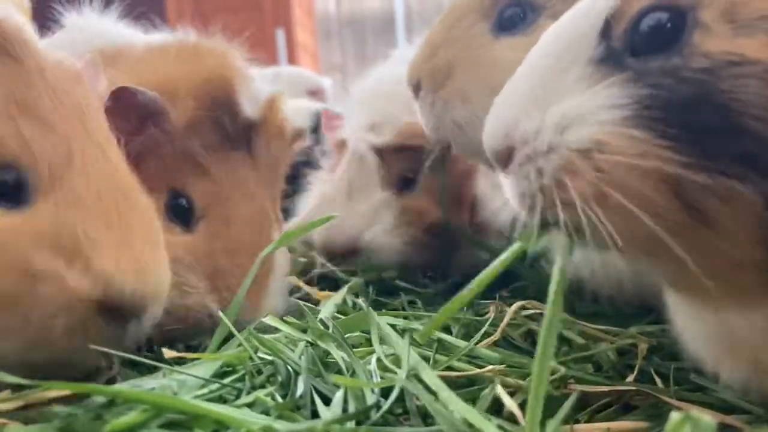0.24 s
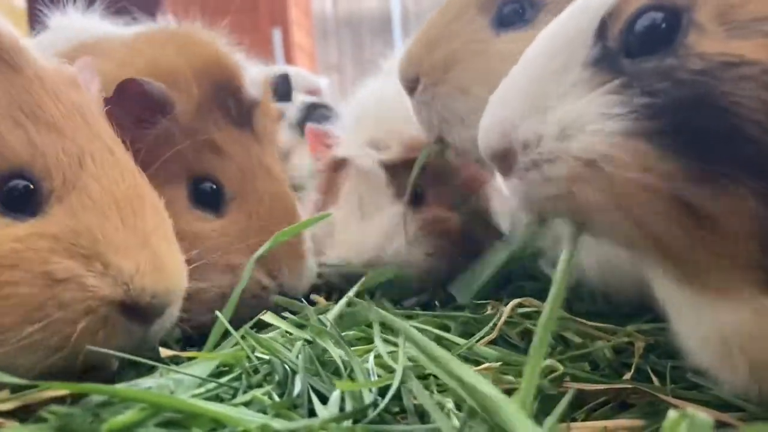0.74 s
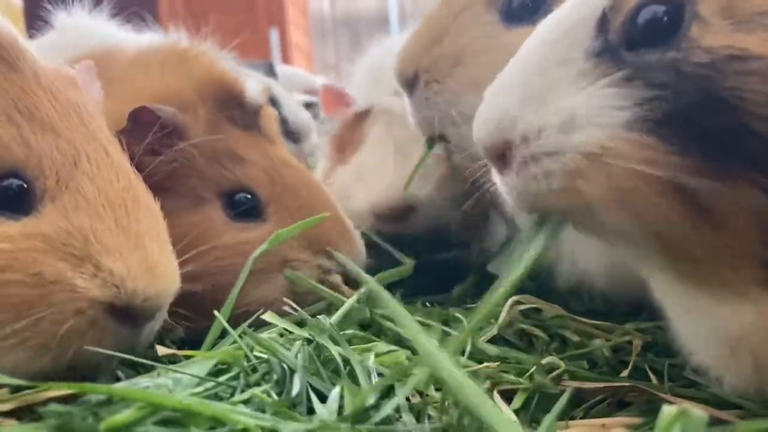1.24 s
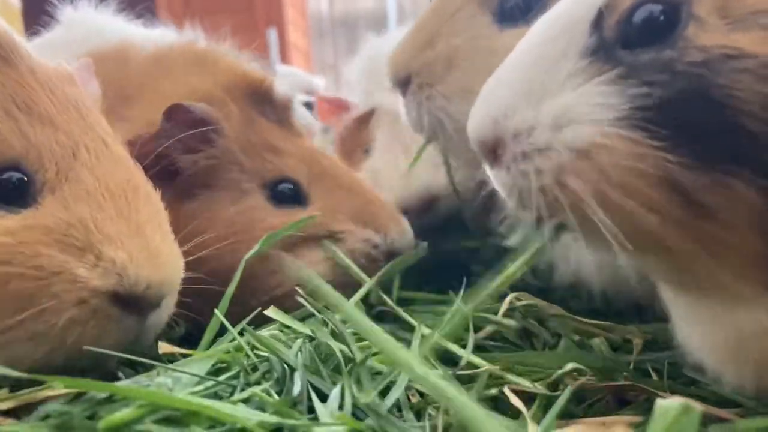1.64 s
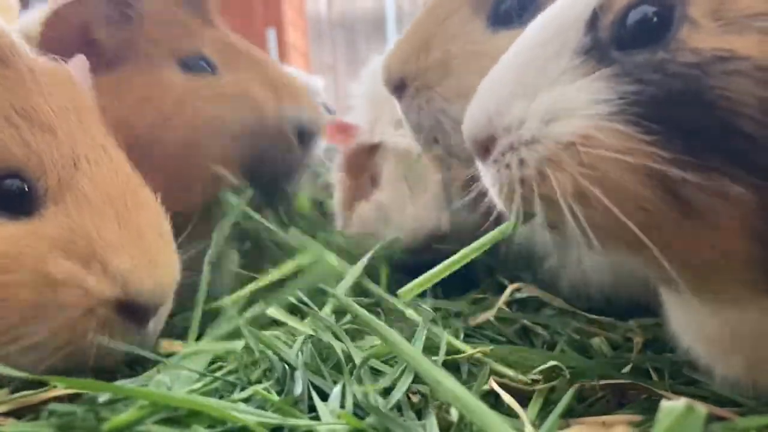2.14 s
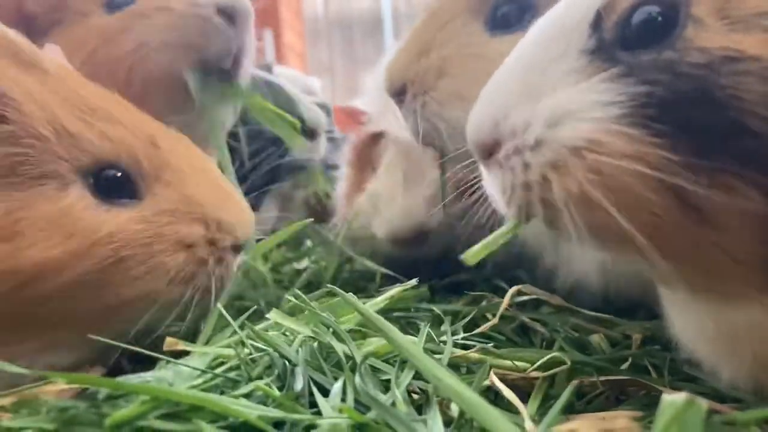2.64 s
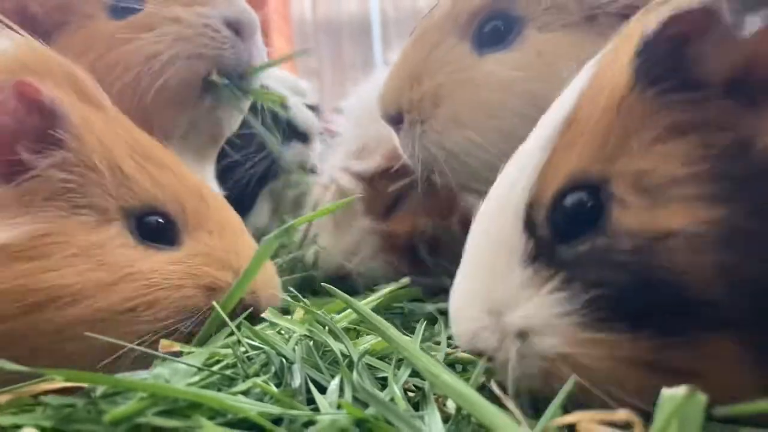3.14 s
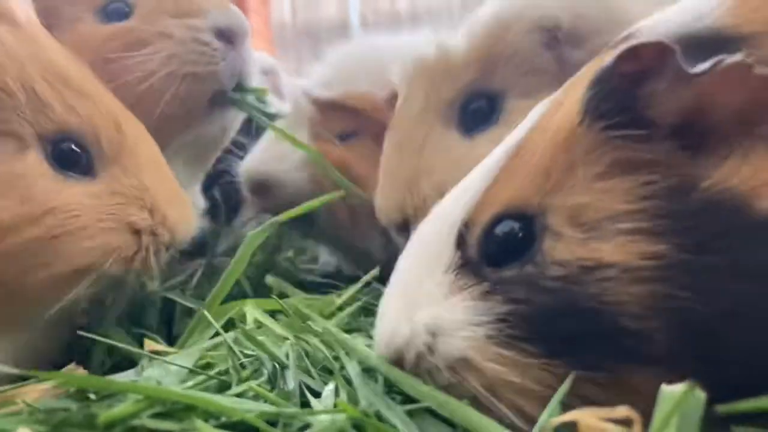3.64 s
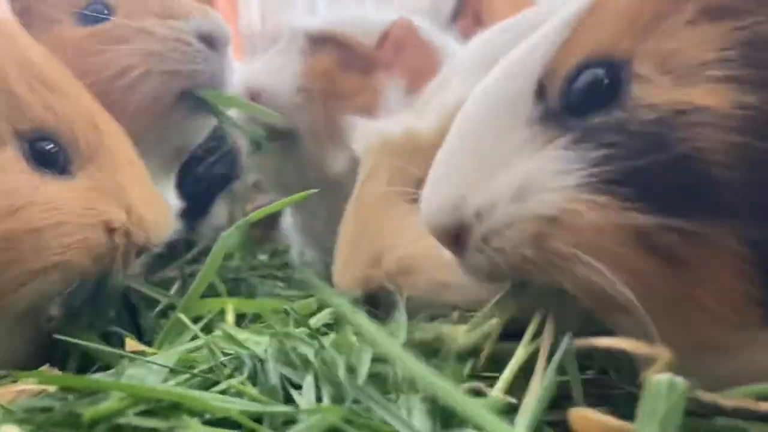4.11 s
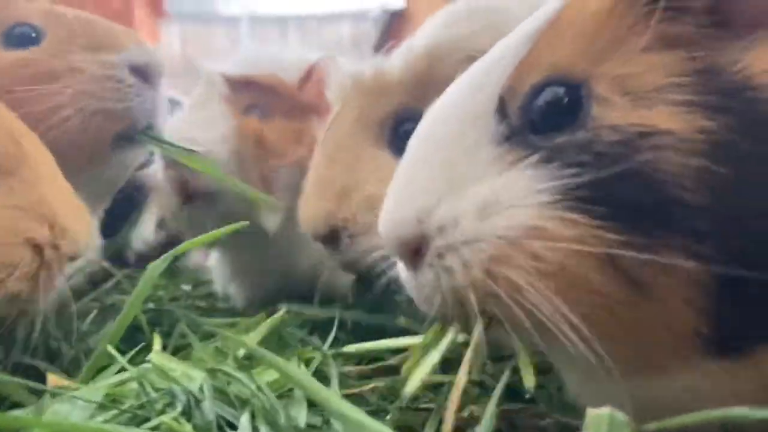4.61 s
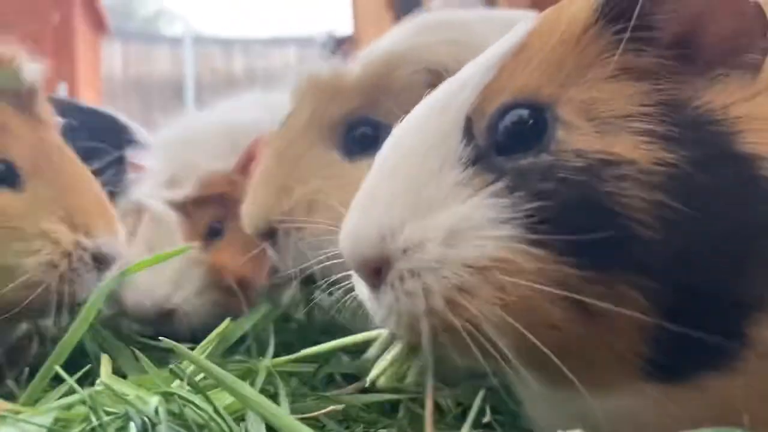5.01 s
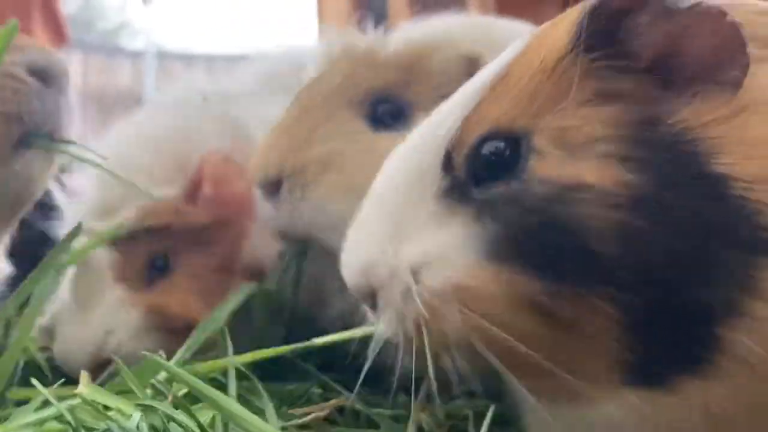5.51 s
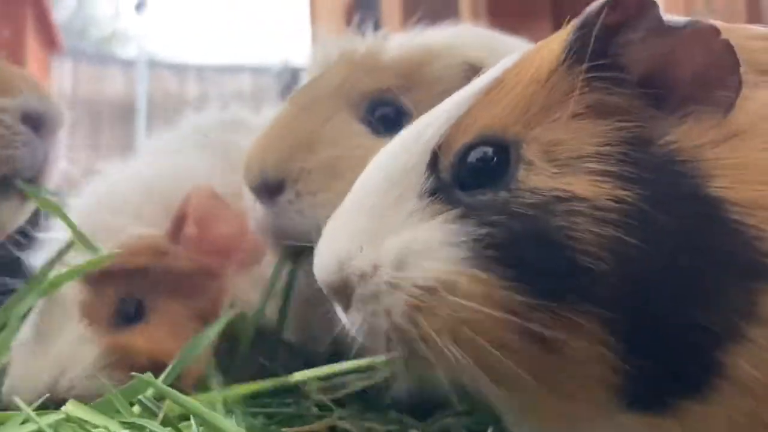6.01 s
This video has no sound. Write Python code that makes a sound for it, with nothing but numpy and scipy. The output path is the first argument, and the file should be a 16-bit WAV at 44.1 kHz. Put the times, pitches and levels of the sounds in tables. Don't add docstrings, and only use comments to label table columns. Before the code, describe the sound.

Guinea pigs munch fresh grass very close up, crisp snaps and moist grinding, with small chirps and squeaks over faint distant traffic rumble.

```python
import sys
import numpy as np
from scipy import signal
from scipy.fft import rfft, irfft
from scipy.io import wavfile
from scipy.ndimage import uniform_filter1d

SR = 44100
rng = np.random.default_rng(int(sys.argv[2]) if len(sys.argv) > 2 else 0)


def store_wav(level_fs):
    pcm = np.round(np.clip(np.atleast_2d(level_fs), -1, 1) * 32767)
    wavfile.write(sys.argv[1], SR, pcm.T.astype(np.int16))


def amplitude_ratio(level_db):
    exponent = np.asarray(level_db, float) / 20
    return 10 ** exponent


N = 276066

# (time [s], level [dB])
TRAFFIC_LEVEL = [(0.0, -49), (1.4, -50), (1.7, -44.5), (1.85, -49.5), (2.4, -51.5), (2.999, -47.5),
                 (4.13, -51.5), (5.0, -50.5), (6.26, -51.5)]
# (frequency [Hz], density [dB per Hz])
TRAFFIC_SPECTRUM = [(15, -5), (25, -40), (54, 3.5), (91, 2.5), (163, -5), (227, -4.5), (509, -14),
                    (677, -21.5), (810, -27), (900, -43), (1170, -39), (1980, -120)]
# (start [s], length [s], pitch [Hz], level [dB], partial 3 re 2 [dB], partial 4 re 2 [dB])
BIRD_RASPS = [
    (2.291, 0.24, 1575, -63.5, 0, -1.2),
    (5.44, 0.27, 1463, -60.5, 5, -0.12),
]
# (time [s], length [s], strength [dB])
BIRD_SURGES = [
    (5.545, 0.022, 4),
    (5.608, 0.032, 2),
    (5.575, 0.022, -11),
    (2.36, .04, 2),
    (2.43, .04, 0),
]
# (frequency [Hz], level [dB], t60 [s])
BOARD_MODES = [(96.6, 8, 0.14), (129.8, -5.5, 0.56), (180, -14, 0.49), (350, -34, 5.3)]
# (time [s], peak [dB], pitch [Hz])
BOARD_KNOCKS = [(0.178, -49.5, 470), (0.248, -47.5, 298), (0.339, -45, 273), (0.42, -47.5, 350),
                (0.494, -40.5, 266.4), (0.513, -37.5, 316), (1.53, -46, 222), (1.592, -48.5, 293),
                (1.698, -51.5, 320), (2.968, -43.5, 240), (3.602, -38, 300), (4.401, -44, 533),
                (4.439, -45.5, 347), (5.317, -46, 480), (5.903, -43.5, 264)]
# (time [s], left minus right [dB])
CALLER_PAN = [(.5, 5), (1.9, -11.5), (2.8, -9), (3.5, -8), (4.4, -9), (4.9, -2.5), (5.3, -10.5), (5.8, 3),
              (6.2, -7.5)]
# (start [s], length [s], first pitch [Hz], last pitch [Hz], level [dB])
CHIRP_SLIDES = [(1.93, 0.053, 566, 720, -52), (2.105, 0.044, 690, 585, -51.5),
                (2.18, 0.04, 487, 840, -46.5), (2.392, 0.012, 770, 724, -41), (2.612, 0.02, 1024, 825, -56),
                (2.875, .016, 1100, 1020, -45), (3.82, 0.028, 494, 590, -48),
                (3.86, 0.066, 650, 664, -46.5), (4.02, 0.022, 660, 610, -49),
                (4.2, 0.047, 933, 1163, -51.5), (4.405, 0.058, 559, 573, -46), (4.46, 0.097, 621, 802, -49),
                (4.922, 0.029, 581, 578, -37.5), (3.335, 0.043, 556, 603, -56),
                (5.89, 0.051, 570, 633, -46.5), (6.21, 0.065, 724, 863, -46.5)]
# (start [s], length [s], end pitch [Hz], middle pitch [Hz], level [dB])
CHIRP_BOWS = [
    (2.022, 0.057, 720, 597, -53),
    (2.888, 0.02, 890, 682, -40),
    (4.61, 0.093, 616, 700, -50.5),
    (5.268, .078, 469, 630, -43.5),
    (2.628, 0.038, 776, 656, -41.5),
]
# (start [s], length [s], held pitch [Hz], top pitch [Hz], level [dB])
CHIRP_SWEEPS = [
    (4.968, .045, 1040, 1950, -42.5),
]
# (time [s], pitch [Hz], level [dB])
CALL_PHRASES = [
    [(2.345, 727, -70), (2.351, 780, -45), (2.357, 710, -39), (2.365, 698, -61), (2.375, 721, -45),
     (2.381, 817, -59), (2.385, 834, -66)],
    [(2.54, 621, -56), (2.552, 625, -49), (2.562, 655, -42), (2.572, 760, -46), (2.59, 759, -51),
     (2.6, 638, -65)],
    [(2.828, 784, -67), (2.834, 760, -51), (2.84, 697, -40), (2.858, 698, -34.5), (2.864, 730, -36),
     (2.87, 824, -45), (2.875, 835, -56)],
    [(5.045, 666, -72), (5.061, 687, -41), (5.075, 674, -38), (5.095, 769, -38.5), (5.121, 741, -42.5),
     (5.143, 805, -46), (5.157, 670, -39), (5.165, 685, -59)],
    [(5.442, 651, -58), (5.452, 654, -43), (5.46, 618, -46), (5.474, 619, -47), (5.48, 594, -36),
     (5.486, 558, -43.5), (5.522, 564, -51)],
    [(5.765, 575, -57), (5.789, 576, -43), (5.805, 685, -43), (5.817, 693, -50), (5.825, 683, -58)],
    [(6.095, 630, -65), (6.101, 633, -54), (6.117, 624, -46.5), (6.143, 632, -44.5), (6.159, 698, -54),
     (6.17, 723, -64)],
]
# (time [s], pitch [Hz], level [dB])
CALL_RISES = [
    [(5.348, 861, -60), (5.354, 845, -45), (5.36, 820, -42), (5.386, 820, -42), (5.406, 1034, -42),
     (5.42, 1491, -46.5), (5.426, 1610, -47), (5.436, 1508, -55), (5.442, 1499, -66)],
]
# (time [s], pitch [Hz], level [dB])
CALL_BREAKS = [
    [(3.262, 637, -50), (3.278, 678, -41.5), (3.292, 680, -41.5), (3.3, 780, -39), (3.311, 1056, -42.5),
     (3.32, 1360, -55), (3.332, 1750, -56), (3.345, 1850, -58)],
    [(3.543, 763, -49), (3.555, 690, -44.5), (3.566, 697, -43.5), (3.578, 947, -44), (3.59, 1100, -46.5),
     (3.598, 1000, -56)],
    [(3.6, 1756, -60), (3.62, 1494, -58), (3.64, 1560, -58), (3.65, 1770, -52), (3.675, 1785, -53),
     (3.69, 1400, -53), (3.705, 950, -60)],
]
# (start [s], length [s], first pitch [Hz], last pitch [Hz], level [dB])
WHINE_SLIDES = [(.49, 0.11, 944, 957, -58.5), (2.07, 0.026, 1034, 1070, -57),
                (3.245, .028, 349, 680, -45.5), (3.92, .11, 772, 987, -51), (4.03, .1, 912, 1090, -54),
                (4.83, 0.029, 908, 940, -45), (4.92, 0.038, 1123, 1130, -50.5),
                (5.532, 0.032, 880, 1140, -50), (3.89, 0.067, 1400, 1720, -60.5),
                (5.005, .04, 2190, 2160, -48), (5.135, 0.03, 3090, 3170, -46.5),
                (5.2, 0.021, 1005, 1150, -49.5), (5.235, 0.026, 1107, 1160, -50.5),
                (5.085, .04, 2900, 3400, -55), (5.3, 0.036, 1596, 895, -49.5),
                (4.85, 0.035, 1710, 1670, -48), (5.1, 0.034, 830, 1135, -45), (5.49, 0.043, 678, 1143, -49)]
# (start [s], length [s], end pitch [Hz], middle pitch [Hz], level [dB])
WHINE_BOWS = [
    (5.445, 0.052, 1040, 1270, -55),
    (5.13, .03, 1400, 1600, -50),
    (5.8, .035, 1200, 1100, -56),
    (3.34, 0.02, 4500, 3750, -56),
    (2.9, .022, 3000, 3350, -61),
]
# (time [s], pitch [Hz], level [dB])
WHISTLE_COURSES = [
    [(3.35, 1850, -58), (3.375, 1714, -57), (3.402, 1850, -62), (3.435, 1400, -47.5)],
    [(5.02, 1770, -55), (5.07, 1895, -48), (5.1, 2476, -49), (5.14, 2205, -51), (5.19, 2170, -48.5),
     (5.215, 2334, -48), (5.25, 1804, -55), (5.288, 1470, -52)],
]
# (time [s], peak [dB])
BLADE_SNAPS = [(0.2892, -42), (0.3274, -42), (0.4186, -37.5), (0.4449, -40.5), (0.5287, -44), (0.5886, -42),
               (0.604, -40), (0.803, -42), (1.1023, -35.5), (1.2172, -38.5), (1.5054, -38), (1.6916, -42),
               (2.0446, -40), (2.0844, -40), (2.3805, -40.5), (2.5636, -41), (2.692, -35.5),
               (2.7452, -45.5), (2.794, -42), (2.89, -45), (3.057, -40), (3.105, -41.5), (3.1408, -40.5),
               (3.2266, -43.5), (3.3865, -36.5), (3.7973, -41), (3.8237, -36), (4.0956, -43),
               (4.154, -42.5), (4.2237, -39.5), (4.4942, -39.5), (4.8553, -38), (4.945, -39),
               (5.3991, -30.5), (5.469, -39), (5.4909, -50), (5.5047, -42), (5.5223, -45), (5.6565, -35.5),
               (5.7179, -40.5), (5.8982, -46)]
# (time [s], peak [dB], 1-3 kHz share [dB], left minus right [dB])
STEM_SNAPS = [(0.4655, -38, -15, -2), (1.075, -42, -10, -0.5), (1.41, -42, -6, -8), (1.493, -46, -15, 2),
              (1.5453, -38, -19, -17), (1.743, -39.5, -8, -4), (1.9955, -40.5, -15, -5),
              (3.1796, -38.5, -15, -0.5), (3.272, -50, -1, -0.5), (3.333, -44, 2, -1.0),
              (3.559, -40, -15, -11.5), (3.6669, -38.5, -3, -7), (3.721, -47, -3, -16),
              (3.772, -32.5, -14.5, -20), (4.4014, -27, -7, -10.5), (4.6289, -33.5, -11.5, -2),
              (4.9597, -39, -12, -2), (4.983, -54.5, 12.5, -6), (5.8418, -35.5, -12, -1.0),
              (1.4265, -49, 8, -6), (2.2087, -52.5, 0, -5), (2.817, -54, 5.5, -3), (2.9658, -51, 5, -1),
              (3.481, -46, 3, -7), (4.3308, -50.5, 5, -6), (4.8219, -51, 5, -.6), (5.612, -52, 1, -2),
              (5.705, -54, 4, -2), (5.9209, -50.5, 5, -1.5), (6.04, -49, 3, -2.5), (2.027, -59, 0, -8),
              (2.436, -54, 5, -5)]
# (time [s], effort [dB])
HERD_EFFORT = [(0, 0), (1.9, 0), (2.7, -0.5), (3.27, 2), (3.33, 2.5), (3.84, 5), (3.92, -1), (4.74, -0.5),
               (4.83, 4), (5.2, 4), (5.7, 1.5), (6.26, 0)]
# (time [s], length [s], strength [dB])
GRASS_TUGS = [(.06, 0.059, 5), (.33, 0.03, 2), (.6, 0.059, 0), (.96, 0.074, 3), (1.11, 0.058, 1),
              (1.41, 0.1, 4), (1.5, 0.037, 5), (1.7, 0.11, 2), (2.07, 0.086, 6.5), (2.39, .1, 0.5),
              (2.97, 0.04, 4.5), (3.16, 0.11, 3), (3.49, 0.056, 3.5), (3.78, 0.036, 2), (4.04, 0.24, 3.5),
              (4.23, .04, 4.5), (4.35, 0.064, 6.5), (4.49, 0.053, 5.5), (4.66, 0.086, 3), (4.96, 0.1, 4.5),
              (5.12, 0.043, 0.5), (5.32, 0.045, 1), (5.41, 0.055, 0.5), (5.66, 0.063, 3), (5.78, .04, 5),
              (6.07, 0.058, 4.5)]
# (time [s], length [s], strength [dB])
BUNDLE_BITES = [(.1, 0.077, 5.5), (.47, 0.076, 4), (.61, 0.041, 5), (.76, 0.062, 4), (1.01, 0.07, 5),
                (1.13, .08, 0.5), (1.42, 0.12, 6), (1.66, 0.19, 4.5), (2.09, 0.021, 8), (2.4, 0.18, 9.5),
                (2.62, .05, 6.5), (2.87, 0.046, 7.5), (2.98, 0.17, 5.5), (3.15, 0.045, 7), (3.35, 0.025, 9),
                (3.44, 0.032, 8.5), (3.49, 0.018, 9), (3.665, 0.025, 6.5), (3.725, 0.015, 7),
                (4.05, 0.13, 6.5), (4.28, 0.034, 5.5), (4.55, 0.089, 4.5), (4.83, 0.03, 7.5),
                (4.96, 0.12, 5.5), (5.13, 0.092, 4), (5.46, 0.052, 4.5), (5.79, .06, 4.5), (5.93, 0.025, 7),
                (6.04, 0.037, 7), (6.2, 0.026, 10.5)]
# (frequency [Hz], density [dB per Hz])
GRASS_SPECTRUM = [(1500, -19), (1900, 5.5), (2600, 1.5), (3400, 2), (4300, 2), (5200, -0.5), (6000, -28)]
JAW_SPECTRUM = [(450, -10), (700, 0), (1100, 3.5), (1500, -1), (2000, -16.5)]
RUSTLE_SPECTRUM = [(4500, -42), (5600, -6.5), (6800, 0.5), (8200, 0.5), (10000, 4.5), (12000, -2.5),
                   (15000, -1.5), (16500, -10)]
# (low edge [Hz], high edge [Hz])
WEAK_SUM_BANDS = [(6450, 6800), (9400, 10200), (12600, 13700), (15850, 17000)]
WEAK_DIFFERENCE_BANDS = [(7600, 8500), (11000, 11900), (14100, 15300), (15950, 17000)]

PORT_SPACING_HZ, PORT_ZERO_HZ = 3340, 8120
THUMP_S, THUMP_HZ, THUMP_DB, THUMP_WIDTH_S = 3.6185, 128, -10, 0.0054
WARBLE_SHARE, WARBLE_PER_S = .014, 55
THROAT_TOP_HZ = 2900
SWEEP_HOLD = 0.42
RUSTLE_REST_DB, GRASS_REST_DB, JAW_REST_DB = -65.5, -77, -65.5
GRASS_PER_EFFORT, JAW_PER_EFFORT = 1.51, 0.47


def course(points):
    return np.interp(np.arange(N) / SR, *np.transpose(points))


def colour(x, points, turn=0):
    f_hz = np.fft.rfftfreq(x.shape[-1], 1 / SR) + 1
    hz, db = np.transpose(points)
    gain = amplitude_ratio(np.interp(np.log(f_hz), np.log(hz), db, -120, -120))
    lag = np.exp(-2j * np.pi * turn * (f_hz - PORT_ZERO_HZ) / PORT_SPACING_HZ)
    return irfft(rfft(x) * lag * gain / np.sqrt(np.mean(gain ** 2)), x.shape[-1])


def walk(rate_hz):
    k = int(SR / rate_hz)
    held = np.repeat(rng.standard_normal(N // k + 1), k)
    return 1.133 * uniform_filter1d(uniform_filter1d(held, k), k)[:N]


def bursts(rows):
    t = np.arange(N) / SR
    return sum(db * np.exp(-4 * ((t - s) / length_s) ** 2) for s, length_s, db in rows)


def add(out, sound, start_s, pan_db, lag_s=0.):
    for ear, ear_s, gain in ((0, start_s + lag_s, amplitude_ratio(pan_db / 2)), (1, start_s, amplitude_ratio(-pan_db / 2))):
        i = int(ear_s * SR)
        out[ear, i:i + len(sound)] += (gain * sound)[:max(N - i, 0)]


def traffic():
    mid, side = rng.standard_normal((2, N))
    level_db = course(TRAFFIC_LEVEL) + 2.3 * walk(4.9)
    highpass = signal.butter(2, 420, "high", fs=SR, output="sos")
    wide = signal.sosfilt(highpass, side) + 0.22 * side
    return colour(mid + wide * np.array([[1], [-1]]), TRAFFIC_SPECTRUM) * amplitude_ratio(level_db + 0.5)


def bird():
    out, surge_db = np.zeros((2, N)), bursts(BIRD_SURGES)
    for s, length_s, hz, db, third_db, fourth_db in BIRD_RASPS:
        u = np.arange(0, 1, 1 / (length_s * SR))
        n = len(u)
        arch = 1 - 0.11 * (1 - np.minimum(u / 0.24, 1)) ** 2
        pitch = arch + 0.0082 * walk(60.7)[:n] + 0.027 * walk(700)[:n]
        phase = 2 * np.pi * hz * np.cumsum(pitch) / SR
        tone = np.sin(2 * phase) + amplitude_ratio(third_db) * np.sin(3 * phase) + amplitude_ratio(fourth_db) * np.sin(4 * phase)
        level_db = db + surge_db[int(s * SR):][:n] + 3.3 * walk(143.4)[:n]
        add(out, tone * np.sin(np.pi * u) ** 1.1 * amplitude_ratio(level_db), s, -2.5, .00002)
    return out


def thump(out, t):
    since = t - .03
    bell = np.exp(-(since / THUMP_WIDTH_S) ** 2 / 2)
    blow = amplitude_ratio(THUMP_DB) * bell * np.cos(2 * np.pi * THUMP_HZ * since + 1.9)
    late = np.clip(since - .012, 0, None)
    ring = sum(amplitude_ratio(db) * np.exp(-np.log(1000) * late / t60_s) * np.sin(2 * np.pi * hz * late)
               for hz, db, t60_s in BOARD_MODES)
    add(out, blow + amplitude_ratio(-27.0) * ring * np.minimum(late / 0.011, 1), THUMP_S + since[0], -.8, .0003)


def boards():
    out, t = np.zeros((2, N)), np.arange(0, .3, 1 / SR)
    thump(out, t)
    for (s, db, hz), grain in zip(BOARD_KNOCKS, rng.standard_normal((len(BOARD_KNOCKS), len(t)))):
        scrape = colour(grain, [(.5 * hz, -14), (hz, 0), (1.58 * hz, -8), (2500, -34), (5000, -60)])
        decay = t / 0.0049 * np.exp(-t / 0.0087)
        add(out, amplitude_ratio(db + 3) * decay * (np.sin(2 * np.pi * hz * t) + 0.92 * scrape), s, 0)
    return out


def slide(u, first_hz, last_hz):
    return first_hz + (last_hz - first_hz) * u


def bow(u, ends_hz, middle_hz):
    return middle_hz + (ends_hz - middle_hz) * (2 * u - 1) ** 2


def sweep(u, held_hz, top_hz):
    return held_hz + (top_hz - held_hz) * (np.clip(u - SWEEP_HOLD, 0, 1) / (1 - SWEEP_HOLD)) ** 1.1


def sung(rows, shape):
    u = np.linspace(0, 1, num=17)
    swell_db = np.interp(u, [0, 0.46, 1], [-2, 0, -4.5])
    return [np.transpose([s + length_s * u, shape(u, a, b), db + swell_db]) for s, length_s, a, b, db in rows]


def voices(calls, overtones_db, jitter, shimmer_db, lag_s):
    out = np.zeros((2, N))
    pitch_flutter, slow_shimmer, fast_shimmer, warble = walk(180), walk(90), walk(450), walk(WARBLE_PER_S)
    for call in calls:
        s, hz, db = np.transpose(call)
        t = np.arange(s[0], s[-1], 1 / SR)
        i = np.minimum((t * SR).astype(int), N - 1)
        pitch_hz = np.interp(t, s, hz)
        unsteady = 1 + jitter * pitch_flutter[i] + WARBLE_SHARE * warble[i]
        phase = 2 * np.pi * np.cumsum(pitch_hz * unsteady) / SR
        tone = np.sin(phase)
        for k, overtone_db in enumerate(overtones_db, start=2):
            throat = 1 / (1 + (k * pitch_hz / THROAT_TOP_HZ) ** 6)
            tone = tone + amplitude_ratio(overtone_db) * throat * np.sin(k * phase)
        edge = np.clip(np.minimum(t - s[0], s[-1] - t) / 0.0042, 0, 1)
        level_db = np.interp(t, s, db) + shimmer_db * (slow_shimmer[i] + 1.2 * fast_shimmer[i])
        pan_db = np.interp(s[0], *np.transpose(CALLER_PAN))
        add(out, np.sqrt(2) * tone * edge * amplitude_ratio(level_db), s[0], pan_db, lag_s)
    return out


def herd_calls():
    chirps = [*sung(CHIRP_SLIDES, slide), *sung(CHIRP_BOWS, bow), *sung(CHIRP_SWEEPS, sweep)]
    whines = [*sung(WHINE_SLIDES, slide), *sung(WHINE_BOWS, bow), *WHISTLE_COURSES]
    calls = voices(chirps, (-18, -29), .016, 2.0, 0.00033)
    calls += amplitude_ratio(1.6) * voices([*CALL_PHRASES, *CALL_RISES], (-18, -29, -28), .012, 1.2, 0.0003)
    calls += voices(CALL_BREAKS, (-11, -20, -17), .016, 2.0, 0.00032)
    calls += voices(whines, (-15, -26), .016, 2.2, 0.000093)
    echo = sum(amplitude_ratio(db) * np.roll(calls[::-1], int(lag_s * SR), axis=1)
               for lag_s, db in ((.007, -48), (.016, -28), (.029, -22.5)))
    return calls + echo


def snaps():
    bright, dull, t = np.zeros(N), np.zeros((2, N)), np.arange(0, .02, 1 / SR)
    rows = [(s, db, -34, 0) for s, db in BLADE_SNAPS] + list(STEM_SNAPS)
    for (s, db, body_db, pan_db), grain in zip(rows, rng.standard_normal((len(rows), 2, len(t)))):
        i = int(s * SR)
        fibre = grain[0] + 0.91 * grain[1, -1] * np.roll(grain[0], 1)
        crack = fibre / np.std(fibre[:24]) * (np.exp(-t / 0.00052) + 0.087 * np.exp(-t / 0.0057))
        bright[i:i + len(t)] += amplitude_ratio(db + 2.0) * crack[:N - i]
        body = grain[1] / np.std(grain[1, :70]) * np.exp(-t / 0.0017)
        add(dull, amplitude_ratio(db + body_db + 15.0) * body, s, pan_db)
    return bright, colour(dull, [(350, -5), (700, 14.0), (2500, 6.0), (4500, 3.5), (6000, -52)]) * 0.15


def crackle(rate_hz, spread_db, share):
    chance, size = rng.random((2, N))
    ticks = (chance < rate_hz / SR) * amplitude_ratio(-spread_db * np.log(1 - .9 * size)) * rng.standard_normal(N)
    share = np.clip(share, 0, 1)
    return np.sqrt(share) * ticks / np.std(ticks) + np.sqrt(1 - share) * rng.standard_normal(N)


def eating():
    effort_db, bite_db = course(HERD_EFFORT), bursts(BUNDLE_BITES)
    rustle_db = RUSTLE_REST_DB + effort_db + bursts(GRASS_TUGS) + 0.21 * bite_db
    grass_db = GRASS_REST_DB + GRASS_PER_EFFORT * effort_db + bite_db
    jaw_db = JAW_REST_DB + JAW_PER_EFFORT * effort_db + 0.21 * bite_db
    bite, grind = walk(9), walk(30)
    bright, dull = snaps()

    stems = uniform_filter1d(crackle(700, 7.4, 1.0), size=3) * amplitude_ratio(2 + 1.1 * walk(32))
    blades = np.gradient(crackle(900, 6.7, 0.71)) * amplitude_ratio(4.5 + 0.96 * walk(34))
    rustle = (stems + blades) * amplitude_ratio(rustle_db + 1.5 + 0.8 * bite + 1.2 * grind) + bright
    treble = np.array([colour(rustle, RUSTLE_SPECTRUM), colour(rustle, RUSTLE_SPECTRUM, turn=1)])

    fibres = np.array([crackle(800, 5.9, 0.56), crackle(800, 4.5, 0.61)])
    grass = colour(fibres, GRASS_SPECTRUM) * amplitude_ratio(grass_db + 9 + 0.53 * bite + 2.33 * grind)

    molars = np.array([crackle(250, 1.6, 0.12), crackle(250, 2.9, 0.14)])
    shuttle = np.sin(2 * np.pi * np.cumsum(17.0 + 3.38 * walk(3.4)) / SR)
    jaws = colour(molars, JAW_SPECTRUM) * amplitude_ratio(jaw_db + 18 + .15 * grass_db + 3.7 * shuttle + 1.8 * walk(40))

    lean = amplitude_ratio(np.array([[-1.5], [1.5]]))
    return treble + lean * (grass + jaws) + dull + amplitude_ratio(-17.0) * colour(bright, GRASS_SPECTRUM)


def scene():
    return traffic() + bird() + boards() + herd_calls() + eating()


def starve(x, bands, steady):
    f_hz = np.fft.rfftfreq(N, 1 / SR)
    inside = sum((f_hz > lo) & (f_hz < hi) for lo, hi in bands)
    return x - steady * irfft(rfft(x) * inside, N)


def band_limit(x):
    return signal.sosfilt(signal.butter(12, 16650, fs=SR, output="sos"), x)


def record(dry):
    treble = np.abs(np.diff(dry[0], 2, prepend=[0, 0]))
    frames = np.resize(treble, (N // 1024 + 1, 1024))
    crest = frames.max(1) / frames.mean(1)
    steady = np.repeat(crest < np.quantile(crest, .64), 1024)[:N]
    steady = uniform_filter1d(1. * steady, size=256)
    mid = starve((dry[0] + dry[1]) / 2, WEAK_SUM_BANDS, steady)
    side = starve((dry[0] - dry[1]) / 2, WEAK_DIFFERENCE_BANDS, steady)
    return band_limit(np.array([mid + side, mid - side]))


dry = scene()
out = record(dry)
store_wav(out)
```